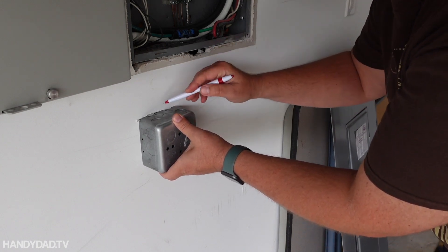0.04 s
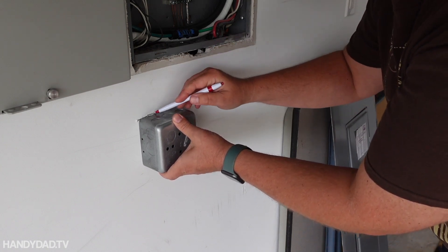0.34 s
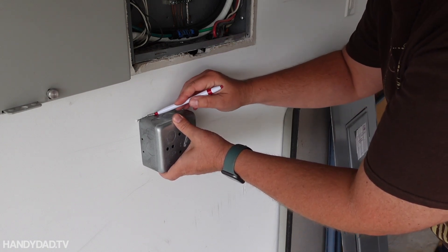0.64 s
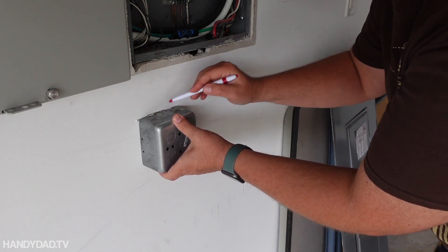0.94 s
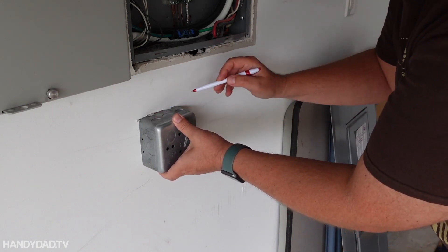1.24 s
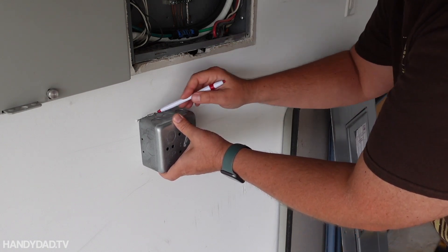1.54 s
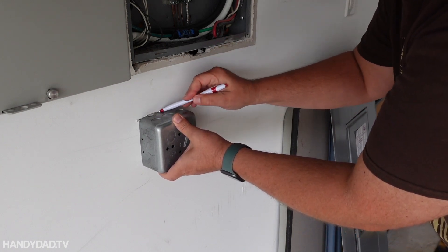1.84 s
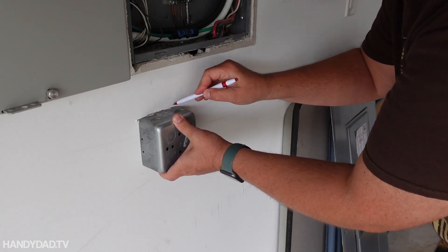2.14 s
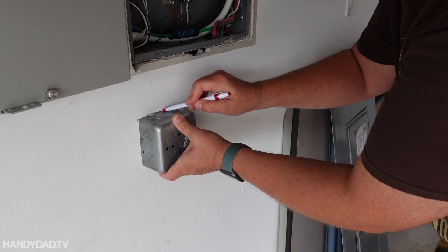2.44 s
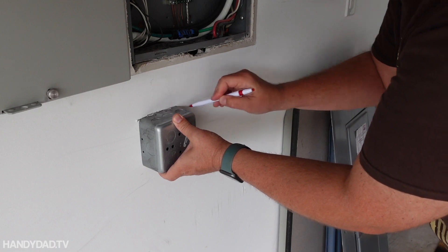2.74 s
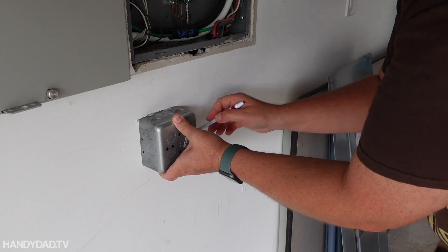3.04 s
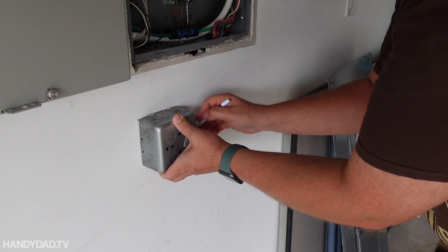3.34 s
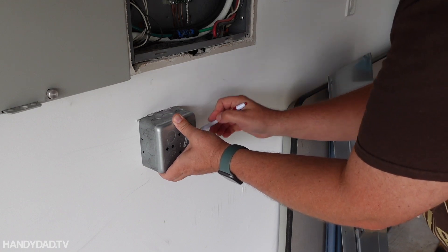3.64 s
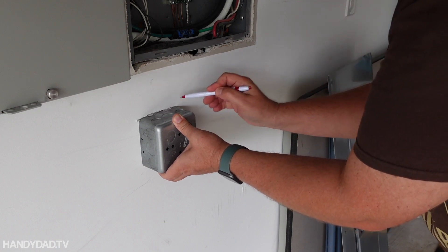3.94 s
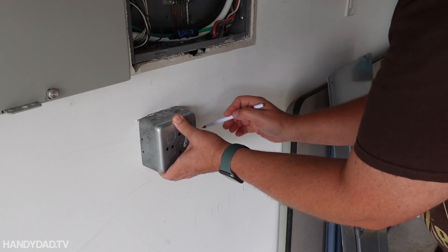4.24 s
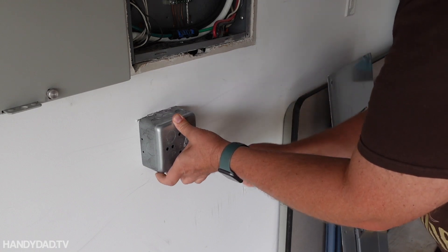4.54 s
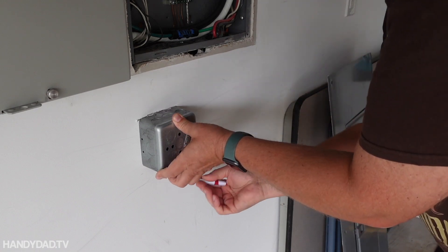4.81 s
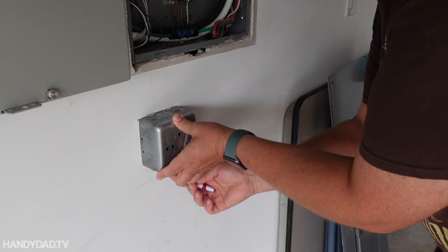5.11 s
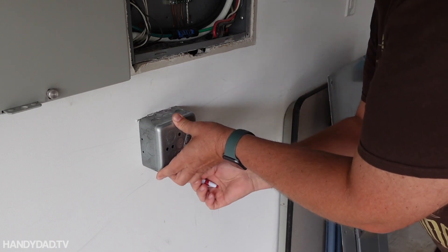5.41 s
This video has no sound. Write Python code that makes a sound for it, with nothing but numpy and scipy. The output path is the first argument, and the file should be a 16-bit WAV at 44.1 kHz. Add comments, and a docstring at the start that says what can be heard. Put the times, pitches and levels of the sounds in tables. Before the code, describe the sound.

A plastic pen traces around a steel outlet box held against drywall in a garage. Faint ticks come first, then the box knocks once sharply on the wall. The tip drags in short strokes while the barrel clicks, scrapes and squeaks on the metal, which rings a little differently along each edge. The sounds are close and slightly to the left, over a quiet, steady room hum.

```python
"""Faint ticks over a quiet room hum, then a plastic pen tracing a steel outlet box held against drywall.
A close stereo pair of microphones in a garage, the work slightly to the left. The pen ticks as it lands,
its tip drags over the wall, and its barrel scrapes and squeaks along the top, side and bottom of the box,
which rings differently along each edge. Once the box knocks hard on the wall."""
import sys
import numpy as np
from scipy import signal
from scipy.fft import rfft, irfft
from scipy.io import wavfile
from scipy.ndimage import uniform_filter1d

SR = 44100
rng = np.random.default_rng(int(sys.argv[2]) if len(sys.argv) > 2 else 0)


def waveform_to_disk(signal):
    """Save audio, clipped to [-1, 1], as 16-bit WAV at the path in sys.argv[1]."""
    frames = np.transpose(np.atleast_2d(signal))
    scaled = np.clip(frames, -1, 1) * 32767
    samples = np.round(scaled).astype(np.int16)
    wavfile.write(sys.argv[1], SR, samples)


N = 245637
TIME = np.arange(N) / SR
RING_SAMPLES = 8192
HZ = np.fft.rfftfreq(RING_SAMPLES, 1 / SR)

# Seconds at which the pen moves from top (edge 0) to side (1), and from side to bottom (2).
EDGE_CHANGES = [3.0, 4.5]
# Passes of the pen. Each row: start in seconds, length in seconds, tip drag in dB, barrel rub in dB,
# rise from start to end in dB.
PASSES = [(1.718, .04, -51, -52.5, 1.5), (1.777, 0.29, -54, -53.5, 0), (2.443, 0.11, -46.5, -49.5, -5.5),
          (2.566, 0.1, -47.5, -53, -9.5), (3.322, 0.12, -54.5, -44.5, 9.5), (3.768, 0.14, -53, -48, 10),
          (5.118, 0.084, -62, -58.5, -4), (5.314, 0.35, -51, -48, 16)]
# The barrel bearing on the steel. Each row: middle in seconds, length in seconds, level in dB,
# extra treble in dB, squeak pitch in Hz, squeak level in dB.
SCRAPES = [(1.728, 0.019, -51.5, 0, 2956, -49.5), (1.756, 0.028, -56.5, 5, 2940, -54),
           (2.089, 0.035, -45, -4, 6330, -58), (2.114, 0.022, -53, 3, 6440, -59),
           (2.375, 0.043, -44.5, -4.5, 6400, -50.5), (2.466, 0.028, -51, 5, 8240, -50),
           (2.538, 0.043, -43, 0.5, 6400, -43.5), (2.621, 0.026, -39, -19, 6350, -59),
           (3.38, .11, -31, -2.5, 1840, -44.5), (3.459, 0.069, -34.5, 8, 5040, -36),
           (3.81, 0.086, -38, -9, 1505, -48.5), (3.898, 0.059, -38.5, 14, 14080, -45),
           (5.413, 0.086, -43.5, -4.5, 3775, -45), (5.485, 0.12, -45, 8, 2990, -45.5),
           (5.556, 0.09, -40, 5, 3740, -48.5)]
# Landings of the pen. Each row: start in seconds, pen click in dB, box ring in dB, wall knock in dB,
# pen brightness in dB per octave, pitch that the point of contact favours in Hz.
TAPS = [(0.035, -62.5, -77, -70, -14, 1920), (0.0901, -60, -77, -57, -9, 1930),
        (0.453, -51, -62, -80, -0.5, 7950), (0.634, -50, -64, -80, 7, 10500),
        (0.7109, -54.5, -54.5, -79, -3, 11700), (1.6057, -39.5, -50, -45.5, 5, 3790),
        (1.686, -58.5, -68, -75, 5, 10100), (1.9319, -34.5, -53, -24, -2, 8820),
        (2.055, -68, -49.5, -58, -5, 8200), (2.2971, -42, -43, -48, 8, 5570),
        (2.4552, -51, -48.5, -45, -18, 6330), (2.481, -48, -38, -50, -11, 8030),
        (2.6129, -45, -42.5, -48, -11, 11500), (3.7479, -43.5, -37.5, -61, 22, 14400),
        (4.737, -63, -65.5, -84, 0, 9000), (4.852, -70, -60.5, -75, 3, 6070),
        (4.968, -59, -67, -78, -2, 8500), (5.112, -56, -55.5, -66, 0, 13300),
        (5.464, -52, -40.5, -48, 0, 6800)]
# Clear modes of the box. Each row: pitch in Hz, width in Hz, then strength in dB against the dense modes
# when touched on top, side and bottom.
BOX_MODES = [(1840, 42, -11, 6.5, 1), (2603, 126, 7, 4.5, 7), (2958, 36, 14, 5, 25.5),
             (3674, 16, -11, 14.5, 26), (4350, 50, -1, 0, -3), (4170, 95, 6.5, 10, 13),
             (5095, 110, -10, 10.5, 6), (5404, 120, 12, 0, 15), (6000, 82, 9, 14, 5),
             (6440, 51, 23.5, 15, 24.5), (6460, 100, 5, 16, 1), (6730, 57, -10, 4, 2),
             (7220, 87, -14, 3, -12), (7350, 45, -13, 17, -4), (7750, 130, 20, -2, 18.5),
             (7960, 26, -14, 13, 19.5), (8480, 70, 22, 4, 15), (9040, 50, 10, 6, -1),
             (10270, 160, 6.5, -2, -9), (11540, 68, 10, -10, -1), (10800, 55, -10, -2, 6),
             (11700, 70, 0, 13, 1)]
# Dense modes of box and barrel. Each row: frequency in Hz, then relative dB on top, side and bottom.
DENSE_MODES = [(200, -17, -18, -28), (950, 3.5, -30, -20), (1650, -8.5, -4, 4.5), (3300, -1.5, -5, -9),
               (4670, -1.5, -0.5, -3), (5900, -3, -5, -4), (8300, -13.5, -0.5, -3.5), (9700, -1, -3.5, -5),
               (11550, -9.5, -10, 0.5), (13200, -6, -10, -14), (15500, -11, -15, -14)]
# The pen's barrel. Each row: pitch in Hz, width in Hz, relative level in dB.
PEN_MODES = [(2820, 2000, -3.5), (3790, 23, 0.5), (4010, 110, -0.5), (5580, 180, -2.5), (6950, 300, -3.5),
             (7700, 130, -4), (8470, 340, -6), (9860, 230, 1.5), (10020, 160, -5), (11130, 87, 2),
             (11350, 200, -1.5), (12300, 2100, -6.5)]
# The box knocking on the wall. Each row: pitch in Hz, width in Hz, relative level in dB.
KNOCK_MODES = [(617, 53, -3), (760, 35, -4), (974, 32, 7.5), (1050, 23, -14), (1382, 69, 1.5),
               (1426, 46, -13), (1975, 65, -8), (2500, 39, -0.5), (2754, 140, -2), (3030, 91, -7),
               (4130, 45, -8.5), (4140, 51, -28), (4470, 93, -9.5), (5600, 35, -19), (7840, 250, -11),
               (8200, 52, -5), (9000, 110, -16), (9500, 250, -17), (10010, 290, -8.5), (10700, 84, -31),
               (13240, 100, -15), (13800, 1800, -20.5)]
# Paper-faced drywall under the tip. Each row: frequency in Hz, relative level in dB.
DRYWALL_SPECTRUM = [(40, -38), (90, -47), (150, 4), (260, 6), (420, 0), (650, 4.5), (950, 4), (1400, -4),
                    (2200, -2.5), (4000, -37), (9000, -28), (16000, -55)]
# The garage's reverberation. Each row: frequency in Hz, seconds to fall by 60 dB.
GARAGE_DECAY = [(150, 0.22), (800, 0.23), (2000, 0.41), (6000, 0.34), (10000, 0.31), (15000, 0.46)]
# Room tone. Each row: frequency in Hz, relative level in dB.
ROOM_SPECTRUM = [(15, -49), (25, -29.5), (78, -4), (157, -2), (200, -7.5), (236, -4.5), (335, -9),
                 (463, -5.5), (591, -9), (695, -6.5), (1020, -9.5), (1890, -14), (4870, -20.5),
                 (14800, -24.5), (16000, -26)]
# Room tone across the pair. Each row: frequency in Hz, left-right correlation from 0 to 1.
ROOM_CORRELATION = [(60, 1), (130, 0.95), (190, 0.92), (290, 0.58), (640, 0.35), (1410, 0.3), (3100, 0.088),
                    (15000, 0.27)]


def stroke(edge, bite_hz=4900):
    """The tip rubs the wall while the barrel scrapes the steel; a harder bite hisses brighter."""
    drag_gain, scrape_gain, treble_gain = contact(edge)
    drag = friction(slips_per_s=2500, spread_db=1.9, flutter_db=0.43, flutter_hz=120) * drag_gain
    grit = friction(slips_per_s=6000, spread_db=2.5, flutter_db=1.2, flutter_hz=220)
    treble = signal.sosfiltfilt(signal.butter(6, bite_hz, "high", fs=SR, output="sos"), grit)
    scrape = (grit - treble) * scrape_gain + treble * treble_gain
    drywall = impulse_response(amp(curve(DRYWALL_SPECTRUM, HZ)))
    return convolve(drag, drywall) + slide(scrape, edge)


def contact(edge, rub_treble_db=-3):
    """Gains of tip drag, barrel scrape and its treble along one edge; passes and scrapes add in power."""
    power = np.zeros((3, N))
    for start_s, length_s, drag_db, rub_db, rise_db in PASSES:
        if np.searchsorted(EDGE_CHANGES, start_s) == edge:
            gains = amp([drag_db, rub_db, rub_db + rub_treble_db])
            power += np.outer(gains, pressure(start_s, length_s, rise_db)) ** 2
    for middle_s, length_s, db, bite_db, _, _ in SCRAPES:
        if np.searchsorted(EDGE_CHANGES, middle_s) == edge:
            power[1:] += np.outer(amp([db, db + bite_db]), arch(middle_s, length_s)) ** 2
    return np.sqrt(power)


def pressure(start_s, length_s, rise_db, set_in_share=0.12, lift_s=0.038):
    """Gain of one pass: it sets in, holds while the hand bears down, and dies away as the pen lifts."""
    age = TIME - start_s
    set_in = np.clip(age / (set_in_share * length_s), 0, 1)
    held = amp(rise_db * (np.clip(age / length_s, 0, 1) - .5))
    return set_in * held * np.exp(-np.maximum(age - length_s, 0) / lift_s)


def friction(slips_per_s, spread_db, flutter_db, flutter_hz):
    """Tiny slips of uneven size that come in clumps as the pen catches and lets go."""
    slips = sparse_clicks(N, slips_per_s)
    sizes = amp(spread_db * np.minimum(rng.exponential(1, N), 4))
    clumps = unit_rms(uniform_filter1d(rng.standard_normal(N), int(SR / flutter_hz)))
    return unit_rms(slips * sizes * amp(flutter_db * clumps))


def slide(scrape, edge, spots=4, spots_per_s=17):
    """The pen passes from spot to spot, so the box's modes swell and fade."""
    return sum(convolve(scrape * crossfade(TIME * spots_per_s, spot, spots), box_ring(edge))
               for spot in range(spots))


def box_ring(edge, vary_db=3):
    """The box's ring at one spot of an edge: clear modes, each louder or softer there, over dense ones."""
    spot_dbs = vary_db * rng.uniform(-1.45, 1, len(BOX_MODES))
    clear_power = sum(amp(edge_dbs[edge] + spot_db) ** 2 / (1 + (2 * (HZ - hz) / width) ** 2)
                      for (hz, width, *edge_dbs), spot_db in zip(BOX_MODES, spot_dbs))
    dense = amp(curve(DENSE_MODES, HZ, column=edge + 1))
    return impulse_response(dense * np.sqrt(1 + clear_power))


def squeaks(width_hz=73):
    """Each scrape carries a narrow, wavering tone that swells and dies with the pressure."""
    out = np.zeros(N)
    for middle_s, length_s, _, _, hz, db in SCRAPES:
        swell = np.hanning(int(length_s * SR))
        drift = np.cumsum(rng.standard_normal(SR)[:len(swell)]) * np.sqrt(2 * np.pi * width_hz / SR)
        drift = uniform_filter1d(drift, SR // 500)  # the phase wanders, which widens the tone
        tone = np.sqrt(2) * np.sin(2 * np.pi * hz * TIME[:len(swell)] + drift)
        add(out, middle_s - length_s / 2, amp(db) * swell * tone)
    return out


def taps(chatter_s=0.0059, first_touch_db=15, favour_db=12.5, favour_q=24, lowest_hz=420):
    """Each landing clicks the barrel, rings the nearest edge and pushes the box on the wall."""
    out, t = np.zeros(N), TIME[:SR // 100]
    for start_s, pen_db, box_db, knock_db, bright_db, favoured_hz in TAPS:
        chatter = rng.standard_normal(len(t)) * np.exp(-t / chatter_s)  # plastic buzzes briefly on steel
        chatter[0] += amp(first_touch_db)  # the first touch is the hardest
        edge = np.searchsorted(EDGE_CHANGES, start_s)
        steel = amp(box_db) * unit_energy(signal.fftconvolve(box_ring(edge), chatter)[:RING_SAMPLES])
        click = amp(pen_db) * ringing(PEN_MODES, bright_db)
        knock = amp(knock_db) * ringing(KNOCK_MODES)
        tap = np.sqrt(len(t)) * (click + steel + knock)  # levels count over 10 ms
        favoured = signal.lfilter(*signal.iirpeak(favoured_hz, favour_q, fs=SR), tap)
        add(out, start_s, tap + (amp(favour_db) - 1) * favoured)
    low_cut = signal.butter(2, lowest_hz, "high", fs=SR, output="sos")  # the taps carry no deep bass
    return signal.sosfilt(low_cut, out)


def ringing(modes, tilt_db=0, max_lag_s=0.000793):
    """A struck body rings in dying sines, each with its own sign and a tiny lag."""
    ring = np.zeros(RING_SAMPLES)
    for hz, width, db in modes:
        age = np.maximum(TIME[:RING_SAMPLES] - rng.uniform(0, max_lag_s), 0)
        size = width * amp(db + tilt_db * np.log2(hz / modes[0][0])) * rng.choice([-1, 1])
        ring += size * np.exp(-np.pi * width * age) * np.sin(2 * np.pi * hz * age)
    return unit_energy(ring)


def bump(middle_s=4.033, length_s=0.023, hz=500, db=-53):
    """One soft, hollow bump after the side is drawn."""
    return amp(db) * arch(middle_s, length_s) * np.sqrt(2) * np.sin(2 * np.pi * hz * TIME)


def garage(x, direct_db=-0.72, near_db=-6.5, tail_db=-10, poses=3, left_db=0.5,
           side_near_db=-16, side_tail_db=-17, side_split_hz=1500, side_treble_db=-3):
    """Echoes shift as the hands move; the close microphones share most of them, least in the low end."""
    mid = amp(direct_db) * x
    for pose in range(poses):
        posed = x * np.sin(np.pi / 2 * crossfade(2 * TIME, pose, poses))  # two poses a second
        mid += amp(near_db) * convolve(posed, near_echoes())
        mid += amp(tail_db) * convolve(posed, garage_tail())
    low = signal.lfilter(*signal.butter(1, side_split_hz, fs=SR), x)
    dulled = low + amp(side_treble_db) * (x - low)
    side = amp(side_tail_db) * convolve(dulled, garage_tail())
    side += amp(side_near_db) * convolve(dulled, near_echoes())
    return np.array([(mid + side) * amp(left_db), (mid - side) * amp(-left_db)])


def near_echoes(first_s=0.003, fade_s=0.0076):
    """Quick reflections from close by: the wall, the arms and the open panel door."""
    t = TIME[:SR // 25]
    return unit_energy(sparse_clicks(len(t), per_s=3000) * (t > first_s) * np.exp(-t / fade_s))


def garage_tail(build_s=0.023):
    """Sparse echoes from farther off in the garage, each band dying at its own speed."""
    hz, t, bands = signal.stft(sparse_clicks(SR, per_s=5000), SR, nperseg=256)
    decay = amp(-60 * t / curve(GARAGE_DECAY, hz)[:, None])
    tail = signal.istft(bands * decay, SR, nperseg=256)[1][:SR]
    return unit_energy(tail * (1 - np.exp(-(TIME[:SR] / build_s) ** 2)))


def room_tone(db=-56, drone_hz=108, drone_width_hz=14, drone_excess_db=-1):
    """Steady room noise with a soft low drone; the bass is nearly alike at both microphones."""
    hz = np.fft.rfftfreq(N, 1 / SR)
    left, unrelated = rfft(rng.standard_normal((2, N)))
    likeness = curve(ROOM_CORRELATION, hz)
    right = likeness * left + np.sqrt(1 - likeness ** 2) * unrelated
    drone = 1 + amp(drone_excess_db) / (1 + (2 * (hz - drone_hz) / drone_width_hz) ** 2)
    colour = amp(curve(ROOM_SPECTRUM, hz)) * drone
    return amp(db) * unit_rms(irfft(np.array([left, right]) * colour, N))


def sparse_clicks(samples, per_s):
    """Impulses at random times, of random sign."""
    return (rng.random(samples) < per_s / SR) * rng.choice([-1., 1.], samples)


def arch(middle_s, length_s):
    """A gain that swells and fades smoothly around its middle."""
    return np.cos(np.pi * np.clip((TIME - middle_s) / length_s, -.5, .5)) ** 2


def crossfade(place, index, count):
    """Triangular weight of one of several positions visited in a cycle."""
    return np.maximum(1 - abs((place - index) % count - 1), 0)


def impulse_response(gain):
    """Response of energy 1 with the given spectral shape and the sharpest attack (minimum phase)."""
    log_gain = np.log(np.maximum(gain, 1e-5))
    mirrored = np.concatenate([log_gain, log_gain[-2:0:-1]])
    return unit_energy(np.fft.ifft(np.exp(np.conj(signal.hilbert(mirrored)))).real)


def curve(table, hz, column=1):
    """One column of a table, joined on a log-frequency axis."""
    columns = np.transpose(table)
    return np.interp(np.log(hz + 1), np.log(columns[0] + 1), columns[column])


def convolve(x, response):
    """Sends a sound through a body or a room."""
    return signal.oaconvolve(x, response)[:N]


def add(mix, start_s, sound):
    """Mixes a sound in at a time."""
    part = mix[round(start_s * SR):][:len(sound)]
    part += sound[:len(part)]


def amp(db):
    """Decibels to gain."""
    return 10 ** (np.asarray(db) / 20)


def unit_rms(x):
    """Scales to rms 1."""
    return x / np.sqrt(np.mean(x ** 2) + 1e-20)


def unit_energy(x):
    """Scales to energy 1."""
    return x / np.linalg.norm(x)


def scene():
    """Strokes, squeaks and taps close to the microphones, with the garage's room tone behind."""
    strokes = sum(stroke(edge) for edge in range(len(EDGE_CHANGES) + 1))
    return garage(strokes + taps() + squeaks() + bump()) + room_tone()


def record(dry, cut_hz=16000):
    """The recorder's band limit."""
    low_pass = signal.firwin(511, cut_hz, window=("kaiser", 9), fs=SR)
    return signal.oaconvolve(dry, low_pass[None], "same")


dry = scene()
out = record(dry)
waveform_to_disk(out)
```